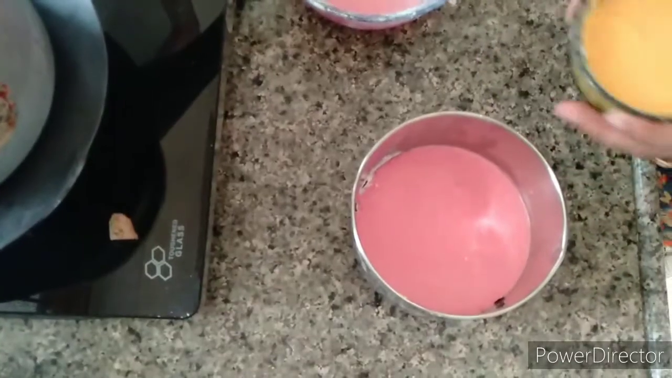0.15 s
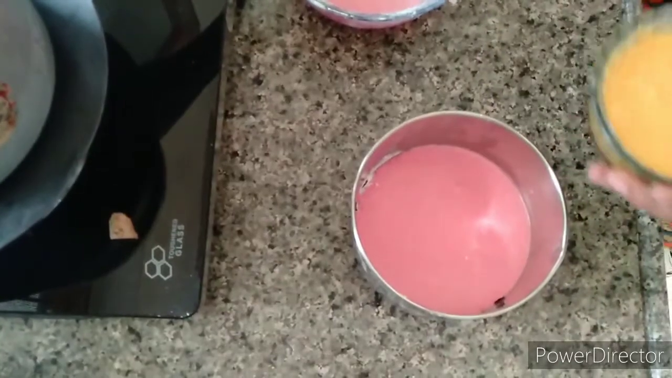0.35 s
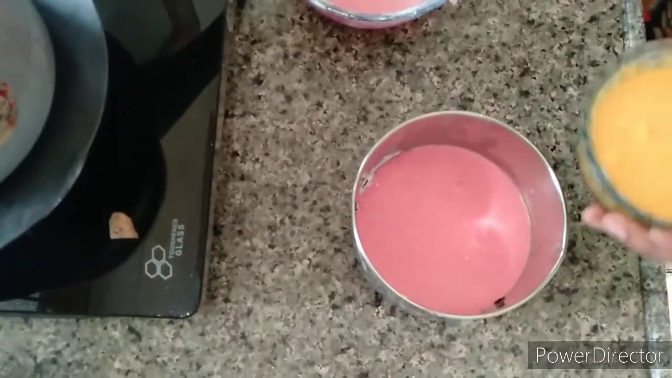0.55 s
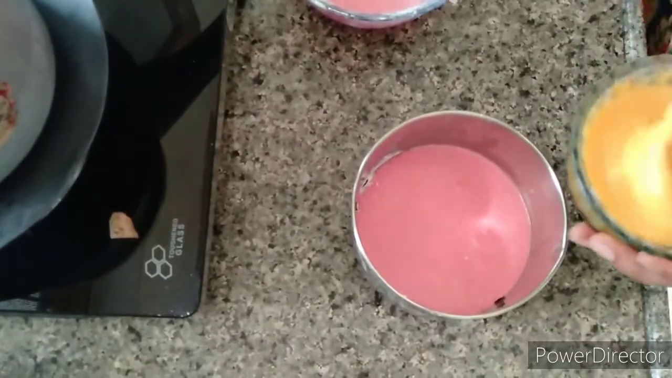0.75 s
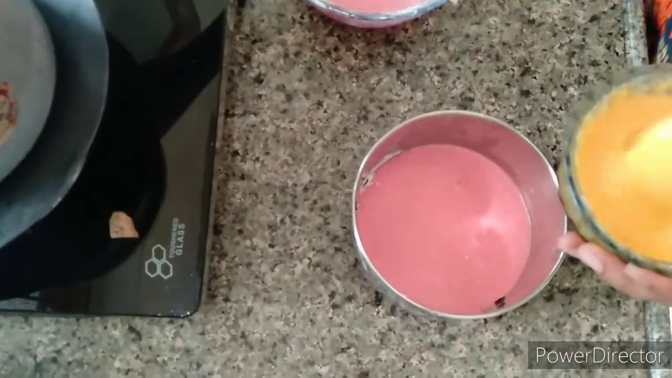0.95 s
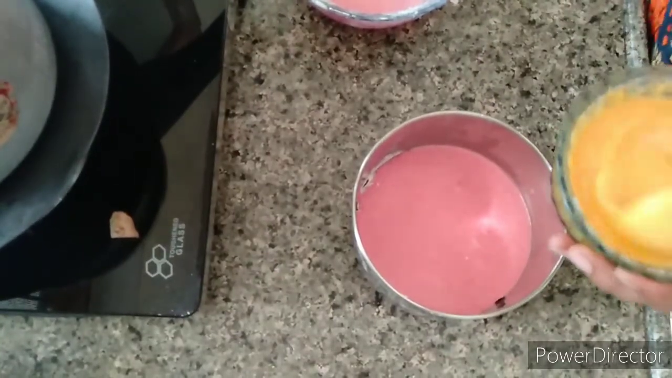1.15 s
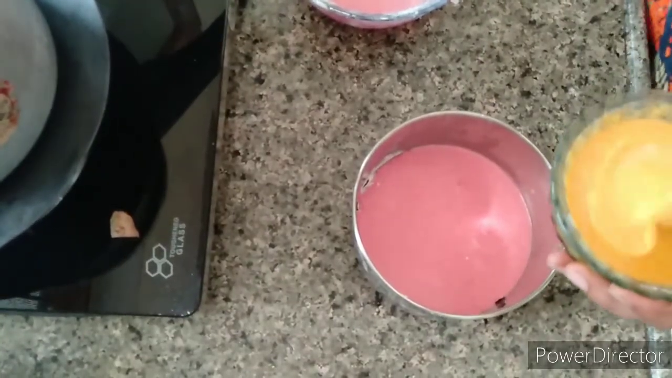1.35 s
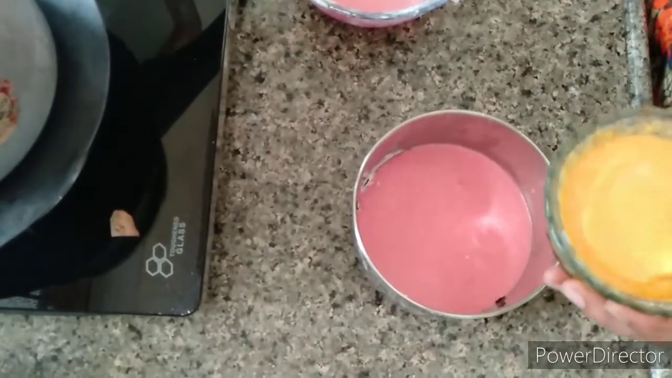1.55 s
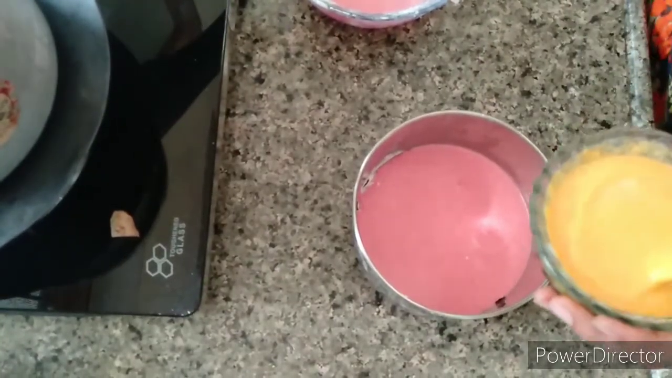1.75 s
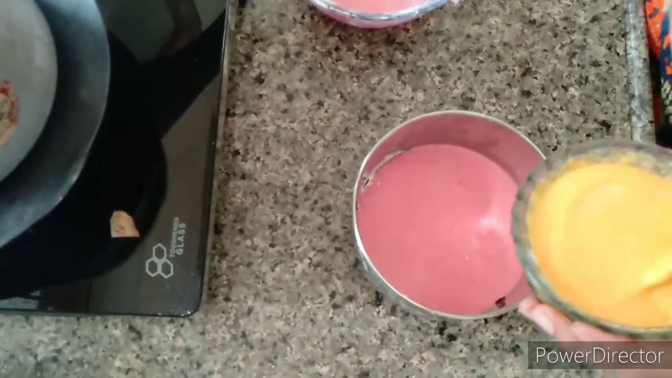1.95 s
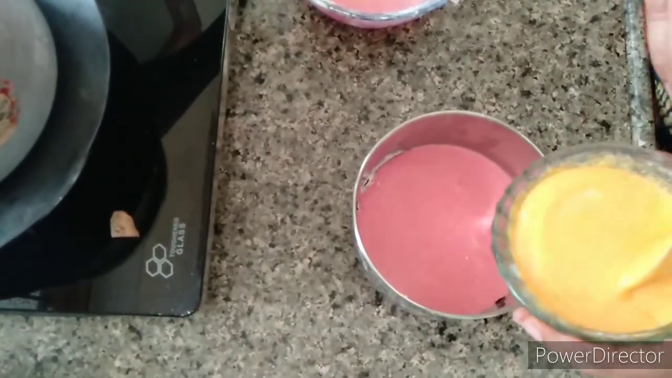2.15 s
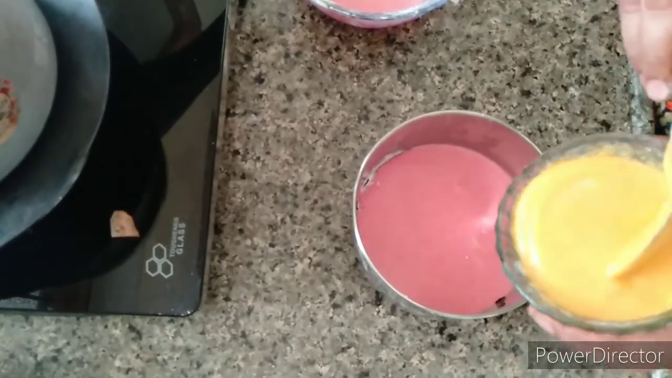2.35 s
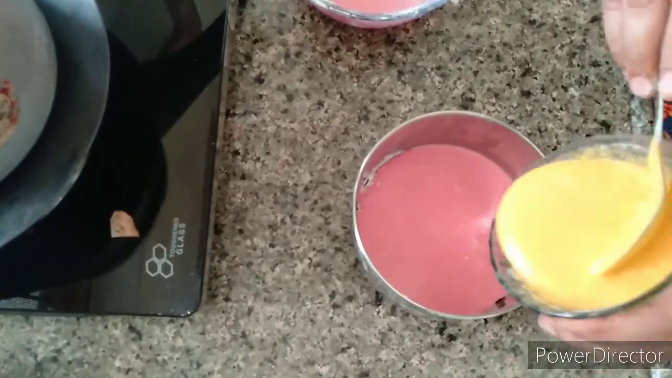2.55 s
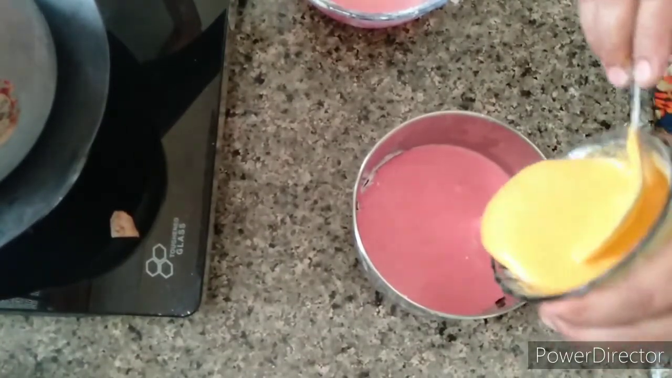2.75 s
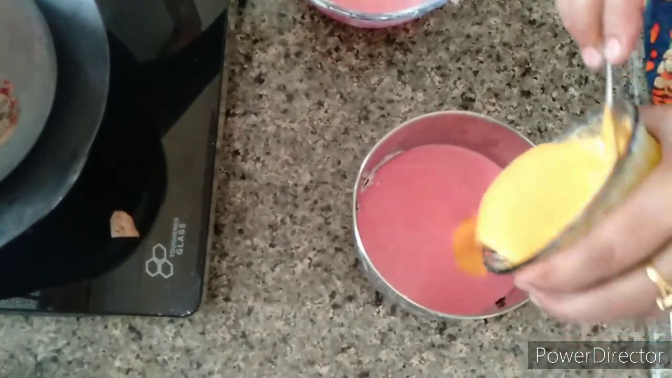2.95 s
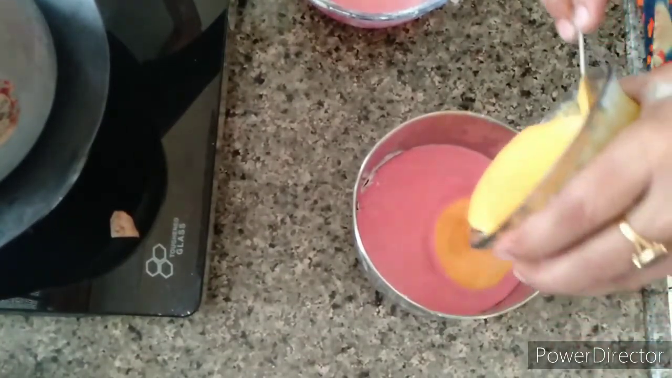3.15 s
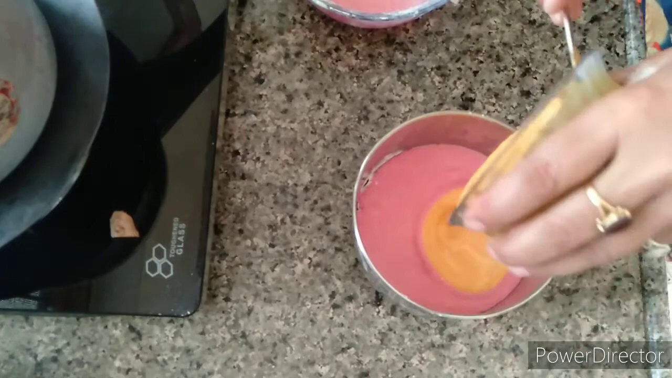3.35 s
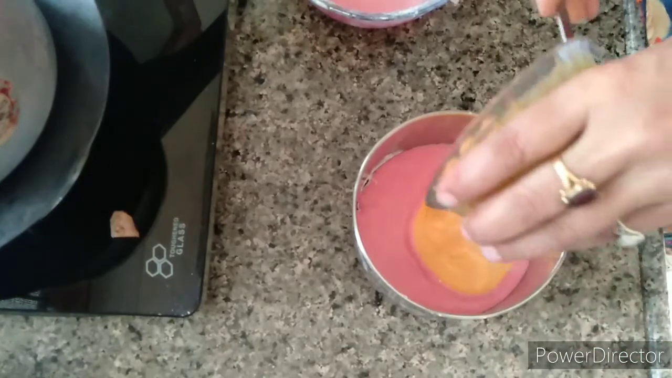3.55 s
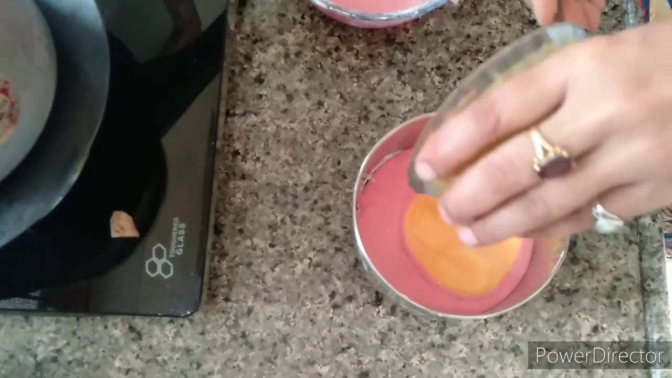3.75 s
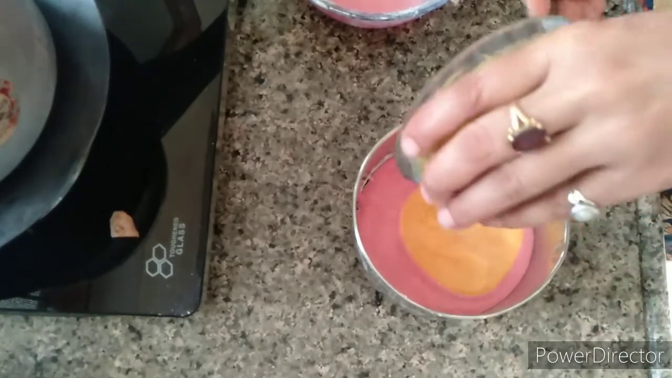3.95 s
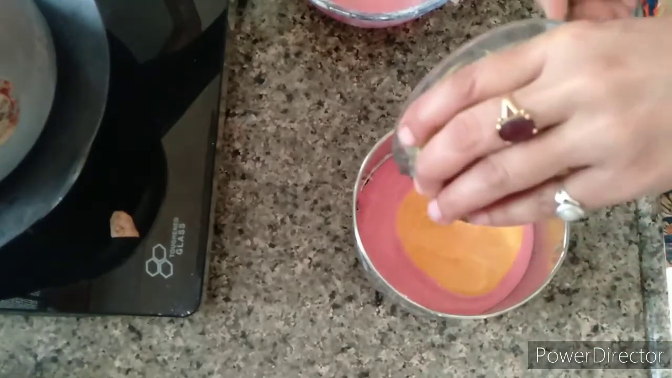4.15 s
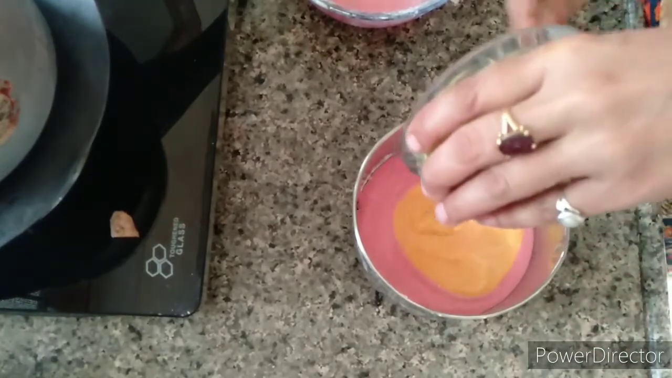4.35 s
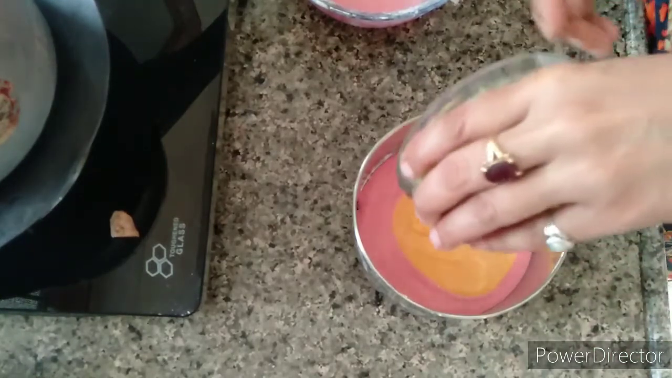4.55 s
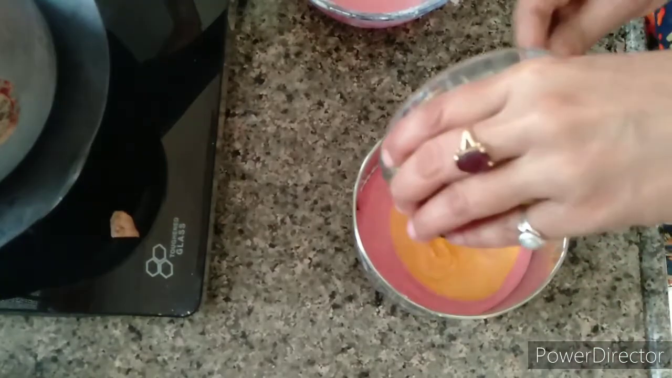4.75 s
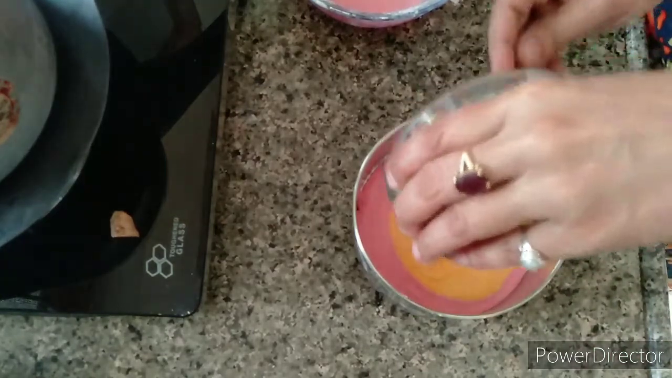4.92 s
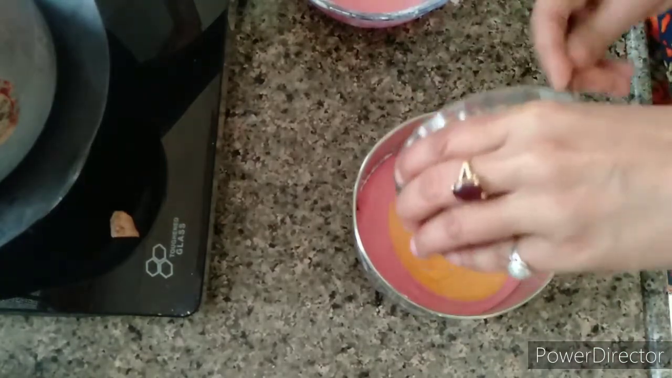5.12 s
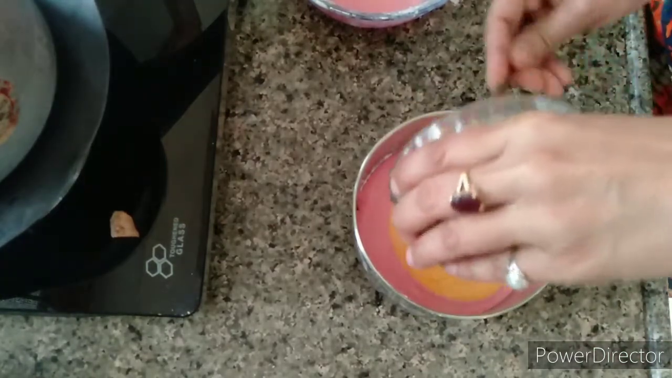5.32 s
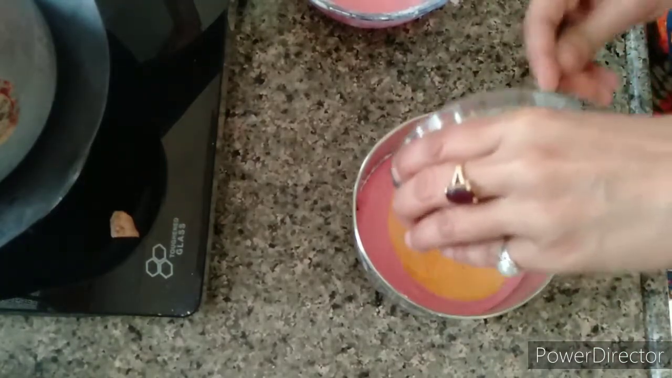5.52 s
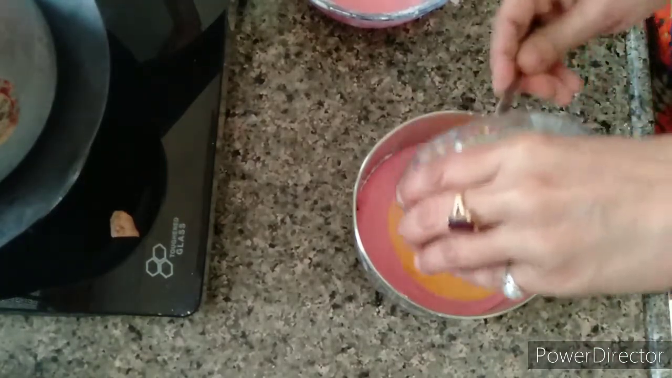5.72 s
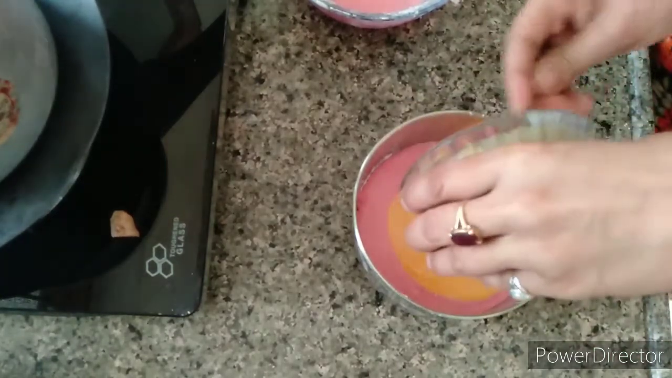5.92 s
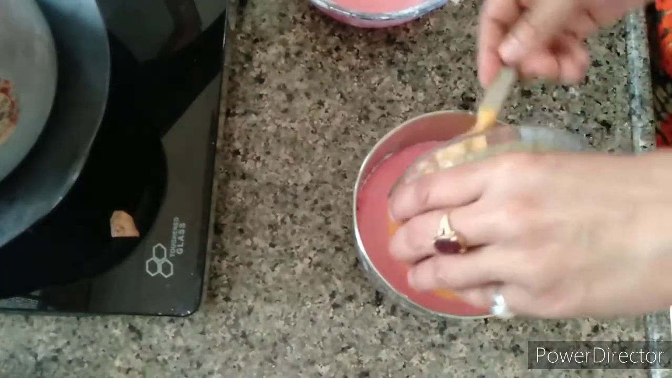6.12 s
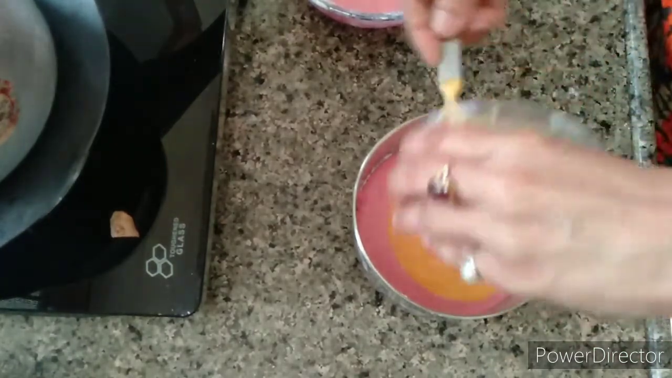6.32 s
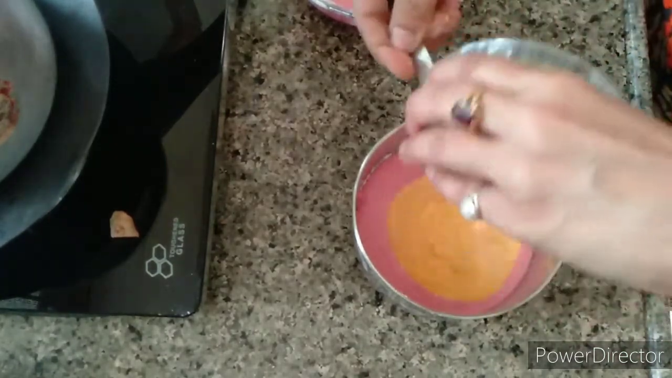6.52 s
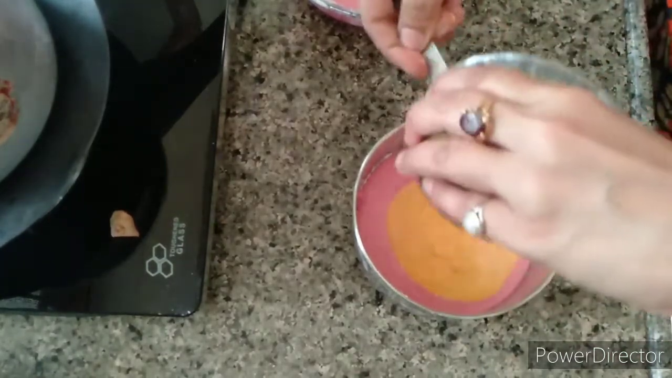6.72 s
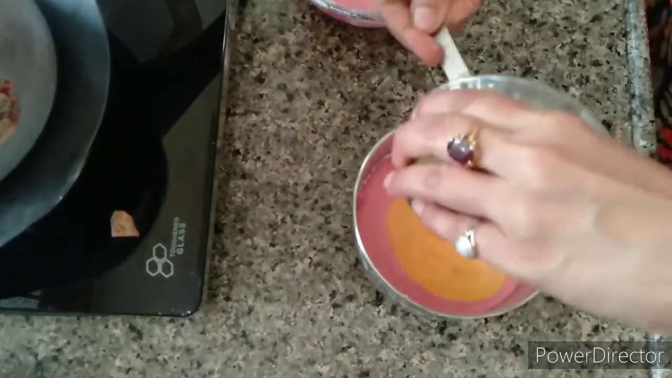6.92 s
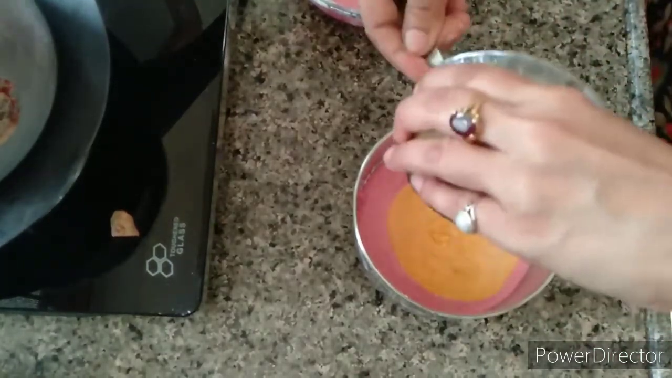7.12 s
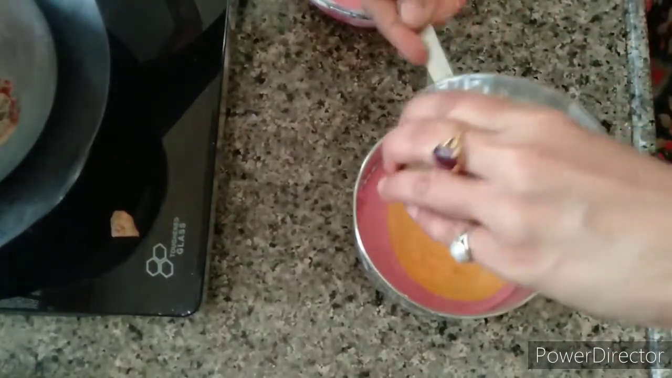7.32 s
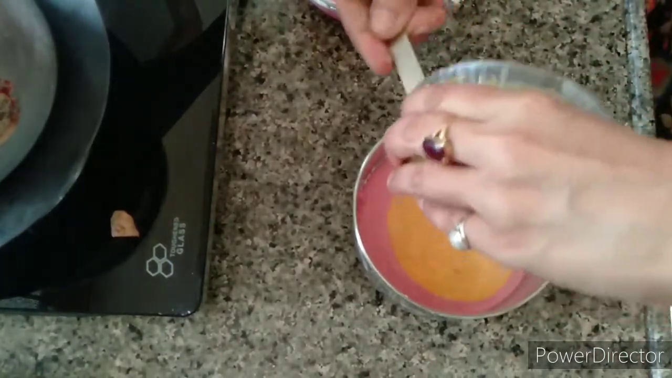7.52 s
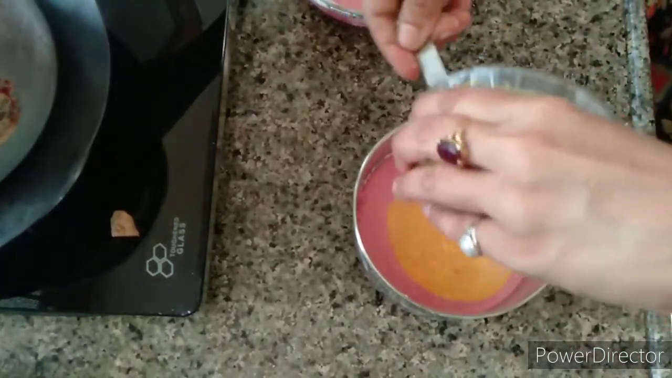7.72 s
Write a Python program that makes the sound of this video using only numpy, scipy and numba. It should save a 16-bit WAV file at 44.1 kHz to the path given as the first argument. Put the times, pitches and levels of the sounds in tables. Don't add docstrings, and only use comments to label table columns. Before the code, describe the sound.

Quiet cloth rustles and one glassy knock lead to a thin rising squeak, then sharp damped spoon clinks and scrapes on a glass bowl.

```python
import sys
import numpy as np
from scipy import signal
from scipy.io import wavfile
from scipy.ndimage import uniform_filter1d
from numba import njit

SR = 44100
rng = np.random.default_rng(int(sys.argv[2]) if len(sys.argv) > 2 else 0)


def decibels_to_gain(level_db):
    exponent = np.asarray(level_db, float) / 20
    return 10 ** exponent


def log_audio(samples):
    frames = np.atleast_2d(samples).T
    limited = np.clip(frames, -1, 1)
    pcm = np.round(limited * 32767).astype(np.int16)
    wavfile.write(sys.argv[1], SR, pcm)


N = 343098
MUFFLED_HZ, MUFFLED_DB = 1700, -7


def unit(x):
    return x / np.sqrt(np.mean(x ** 2))


def curve(rows, col, off=None):
    rows = np.array(rows)
    return np.interp(np.arange(N) / SR, rows[:, 0], rows[:, col], off, off)


@njit
def svf(x, hz, width):
    y, band, low = np.empty(len(x)), 0., 0.
    for i in range(len(x)):
        g, k = np.tan(np.pi * hz[i] / SR), width / hz[i]
        v = (band + g * (x[i] - low)) / (1 + g * (g + k))
        band = 2 * v - band
        low += 2 * g * v
        y[i] = k * v
    return y


def hiss(hz, width_hz, size=N):
    hz = np.clip(hz * np.ones(size), 10, 0.45 * SR)
    once = svf(rng.standard_normal(size), hz, 1. * width_hz)
    return unit(svf(once, hz, 1. * width_hz))


def walk(rate_hz):
    k = int(SR / rate_hz)
    steps = np.repeat(rng.standard_normal(N // k + 1), k)
    return unit(uniform_filter1d(uniform_filter1d(steps, k), k)[:N])


def swells(rows, rest_db, col=1):
    t, out = np.arange(N) / SR, decibels_to_gain(rest_db)
    for row in rows:
        late = t - row[0]
        swing_s = np.where(late < 0, row[2], row[3])
        out = out + decibels_to_gain(row[col] - 15 * np.abs(late) / swing_s)
    return out


def blooms(rows, rest_db):
    t = np.arange(N) / SR
    return decibels_to_gain(rest_db) + sum(decibels_to_gain(db) * np.exp(-(2 * (t - s) / length) ** 2 / 2) for s, db, length in rows)


def add(out, s, db, hz, t60, rise=0.00039):
    i = int(s * SR)
    t = np.arange(min(int(1.2 * t60 * SR) + 9, N - i)) / SR
    shape = (1 - np.exp(-t / rise)) * np.exp(-np.log(1000) * t / t60)
    out[i:i + len(t)] += decibels_to_gain(db) * shape * np.sin(2 * np.pi * hz * t)


def blows():
    # t/s, weight/dB, low ring f/Hz, sharpness/dB, middle ring level/dB
    rim_blows = [
        (3.5566, -29, 1846, -39.5, -46.5),
        (5.2973, -18, 1834, -20, -18.5),
        (5.5333, -25.5, 1856, -29, -32),
        (6.102, -14.5, 1844, -15.5, -18.5),
        (6.3125, -21.5, 1770, -23.5, -49),
        (6.493, -42, 1400, -34.5, -30.5),
        (7.4109, -16.5, 1842, -17.5, -22.5),
    ]
    # t/s, weight/dB, low ring f/Hz, sharpness/dB, edge level/dB
    wall_blows = [(1.1366, -24.5, 1450, -32.5, -21), (2.9432, -46, 1810, -53.5, -46),
                  (3.5935, -47, 1810, -50, -37), (4.044, -32, 1860, -48.5, -31.5),
                  (4.4183, -37.5, 1480, -61, -68), (4.6219, -33, 1070, -52, -35),
                  (4.7038, -29.5, 1065, -29, -14), (4.9237, -47, 1840, -70, -48),
                  (5.1018, -28, 1120, -38, -20), (5.5501, -23.5, 1430, -33, -19),
                  (5.5759, -32, 1790, -37, -20.5), (5.7356, -61, 2010, -58, -39),
                  (5.8548, -23, 1337, -33, -38), (6.048, -60, 1270, -42, -47),
                  (6.3487, -55, 1870, -49, -50), (6.3838, -23, 1510, -34.5, -42),
                  (6.7361, -19.5, 1840, -28.5, -34), (7.0643, -20, 1784, -15.5, -12),
                  (7.197, -30.5, 1877, -44, -27.5), (7.4732, -23, 1465, -29.5, -25),
                  (7.6081, -57, 1950, -73, -48), (7.621, -49, 1820, -51, -56)]
    travel_s = 0.00076
    hits = []
    for s, weight_db, low_hz, sharp_db, middle_db in rim_blows:
        edge_db, top_db = 0.8 * sharp_db, 1.415 * sharp_db + 6
        hits.append((s + travel_s, weight_db, low_hz, sharp_db, edge_db, middle_db, top_db))
    for s, weight_db, low_hz, sharp_db, edge_db in wall_blows:
        middle_db, top_db = 1.11 * sharp_db + 1.3, sharp_db - 54
        hits.append((s + travel_s, weight_db, low_hz, sharp_db, edge_db, middle_db, top_db))
    return sorted(hits)


def edge_mode_hz(low_hz):
    return 3800 if low_hz < 1250 else 2900


def impact_cracks(hits):
    # low f/Hz, high f/Hz, level/dB
    crack_bands = [
        (1840, 4500, -8),
        (600, 2140, 6.5),
        (4270, 8730, 9),
        (11700, 21000, 9),
    ]
    out, trains = np.zeros((2, N)), np.zeros((len(crack_bands), 2, N))
    t = np.arange(2000) / SR
    decay = np.exp(-np.log(1000) * t / 0.018)
    for s, weight_db, low_hz, sharp_db, edge_db, *_ in hits:
        burst = np.zeros((2, len(t)))
        burst[0] = decibels_to_gain(-8) * rng.standard_normal(len(t)) * decay
        burst[:, 0] = -1, -4
        body_db = 0.71 * weight_db - 29 + 10.5 * (low_hz < MUFFLED_HZ)
        fizz_db = 0.77 * sharp_db - 19.5
        span = slice(int(s * SR), int(s * SR) + len(t))
        trains[:, :, span] += decibels_to_gain([edge_db, body_db, sharp_db, fizz_db])[:, None, None] * burst
        low_track = np.full(len(t), max(low_hz, 1450.))
        edge_track = np.full(len(t), 1. * edge_mode_hz(low_hz))
        for side in range(2):
            out[side, span] += decibels_to_gain(weight_db + 14.5) * svf(burst[side], low_track, 694.0)
            out[side, span] += decibels_to_gain(edge_db + 8.5) * svf(burst[side], edge_track, 520.0)
    for train, (low_hz, high_hz, db) in zip(trains, crack_bands):
        band = signal.butter(5, [low_hz, high_hz], "band", fs=SR, output="sos")
        out += decibels_to_gain(db + 7.5) * signal.sosfilt(band, train)
    return out


def glass_rings(out, hits):
    # ratio to ring pitch, level/dB, t60/s
    low_ring = [(1, 1, 0.043), (1.04, -6.5, 0.028), (0.851, -6.5, 0.014)]
    edge_ring = [(1.001, -7, 0.021), (1.07, -15, 0.0032)]
    middle_ring = [(1, 5, .07), (.984, -2, .045), (.963, -4, .03), (1.02, -1, .035)]
    top_ring = [(1.027, 5, .02), (1.005, -1, .03), (.98, -6, .015)]
    for s, weight_db, low_hz, sharp_db, edge_db, middle_db, top_db in hits:
        muffle_db = MUFFLED_DB * (low_hz < MUFFLED_HZ)
        contact_s = 0.00033 * decibels_to_gain(-0.3 * (sharp_db + 18.5))
        for hz, db, ring in ((low_hz, weight_db + muffle_db, low_ring),
                             (edge_mode_hz(low_hz), edge_db, edge_ring),
                             (4770, middle_db + muffle_db, middle_ring),
                             (8180, top_db, top_ring)):
            for ratio, part_db, t60 in ring:
                add(out, s, db + part_db, hz * ratio, t60, contact_s)


def spoon_blade(out, hits):
    # f/Hz, level over sharpness/dB, t60/s
    blade = [(2920, -17.5, 0.062), (3303, -11, 0.053), (3950, -1, 0.023), (4980, -9, .03),
             (5440, -13, 0.03), (6020, -8.5, 0.044), (6300, -6, .025), (7170, -5, .02)]
    for s, _, low_hz, sharp_db, *_ in hits:
        muffle_db = MUFFLED_DB * (low_hz < MUFFLED_HZ)
        for hz, db, t60 in blade:
            scatter_db = 3 * rng.standard_normal()
            add(out, s, sharp_db + db + scatter_db + muffle_db, hz, t60)


def thuds(out):
    # t/s, level/dB, f/Hz, t60/s
    knocks = [
        (1.1375, -34.5, 322, 0.052),
        (1.138, -26.5, 720, 0.017),
        (1.1378, -11.5, 1710, 0.0066),
        (1.1378, -17.5, 4240, 0.0072),
        (7.4125, -31.5, 280, 0.015),
        (6.3135, -36, 440, 0.02),
    ]
    for knock in knocks:
        add(out, *knock, rise=0.0005)


def bowl():
    hits, rings = blows(), np.zeros(N)
    direct_crack, room_crack = impact_cracks(hits)
    glass_rings(rings, hits)
    spoon_blade(rings, hits)
    thuds(rings)
    return direct_crack + rings, room_crack + decibels_to_gain(-6) * rings


def squealing_edge():
    # t/s, f/Hz, level/dB
    squeal = [
        (2.475, 6430, -55.5),
        (2.52, 5420, -48),
        (2.56, 5700, -56),
        (2.59, 6250, -41.5),
        (2.61, 7600, -52),
        (2.64, 9300, -50),
        (2.675, 10480, -44.5),
        (2.705, 9280, -43),
        (2.74, 9400, -70),
    ]
    # t/s, level/dB, rise/s, fall/s, f/Hz
    whistles = [
        (0.18, -65, 0.15, 0.12, 8340),
        (1.754, -72, 0.07, 0.1, 8950),
        (2.3, -71, 0.15, 0.14, 8600),
        (2.4, -65.5, 0.22, 0.43, 8350),
        (3.166, -62, 0.008, 0.03, 8850),
        (3.296, -60, 0.18, 0.12, 8300),
        (4.05, -65, 0.1, 0.35, 8280),
    ]
    hz = curve(squeal, 1)
    ragged = decibels_to_gain(curve(squeal, 2, off=-120) + 4.0 * walk(140))
    out = ragged * (hiss(hz, 370) + decibels_to_gain(-24) * hiss(2 * hz, 900))
    return out + swells(whistles, -120) * decibels_to_gain(2.6 * walk(60)) * hiss(curve(whistles, -1), 690)


def friction(rows, body_rest_db, fizz_rest_db, bands, grain_db):
    body = sum(decibels_to_gain(db) * hiss(hz, width) for hz, width, db in bands)
    fizz = hiss(14700, 6200)
    rubbing = swells(rows, body_rest_db) * body + swells(rows, fizz_rest_db, col=-1) * fizz
    return decibels_to_gain(grain_db * walk(150)) * rubbing


def spoon_drag():
    # t/s, level/dB, rise/s, fall/s, fizz level/dB
    strokes = [(4.8, -52.5, 0.03, 0.2, -69), (5.01, -77, 0.02, 0.07, -84), (5.6, -46.5, 0.02, 0.1, -67),
               (5.73, -54.5, 0.2, 0.51, -70), (6.0, -63, 0.15, 0.3, -71), (6.095, -49, 0.08, 0.005, -69),
               (6.62, -60.5, 0.2, 0.3, -72), (6.73, -45, 0.022, 0.0069, -65),
               (6.878, -52, 0.0091, 0.066, -53), (7.3, -57.5, 0.2, 0.49, -76.5),
               (7.55, -56, 0.02, 0.036, -78), (7.614, -51, 0.029, 0.052, -65),
               (7.77, -59, 0.057, 0.05, -67)]
    # f/Hz, width/Hz, level/dB
    bands = [(1400, 1100, -28), (2870, 1040, -9.5), (4700, 5100, -11.5), (6200, 3300, -9.5)]
    return friction(strokes, -76, -84, bands, grain_db=2.5)


def sleeves():
    # t/s, level/dB, rise/s, fall/s, fizz level/dB
    rubs = [(0.092, -57, 0.043, 0.07, -64), (0.356, -48.5, 0.14, 0.11, -57), (0.714, -58, 0.06, 0.13, -63),
            (0.932, -55, 0.16, 0.11, -67), (1.116, -49, 0.03, 0.024, -68), (1.382, -61.5, 0.15, 0.39, -70),
            (1.918, -57, 0.0071, 0.065, -57), (2.328, -59, 0.018, 0.1, -61), (2.6, -64, 0.21, 0.12, -62),
            (3.03, -70, 0.011, 0.2, -68), (3.17, -58, 0.01, 0.3, -74), (3.6, -57, 0.005, 0.076, -64),
            (3.808, -67, 0.03, 0.086, -61), (4.014, -56, 0.061, 0.1, -71), (4.432, -59, 0.13, 0.056, -71)]
    # f/Hz, width/Hz, level/dB
    bands = [(6530, 1300, -4), (3180, 7300, -4.5), (9800, 7600, -20)]
    return friction(rubs, -76, -74, bands, grain_db=1.0)


def crockery():
    # t/s, level/dB, f/Hz, t60/s
    tinkles = [
        (0.5665, -38.5, 1690, 0.027),
        (0.7456, -45.5, 1445, 0.038),
        (0.9677, -39.5, 2870, 0.029),
        (1.7912, -40.5, 1955, 0.024),
        (5.2684, -43, 1630, 0.14),
        (5.5063, -40.5, 1720, 0.062),
        (7.2883, -45.5, 6480, 0.061),
        (7.6088, -37.5, 2950, 0.022),
    ]
    out = np.zeros(N)
    for s, db, hz, t60 in tinkles:
        add(out, s, db, hz, t60, rise=0.0013)
        add(out, s, db - 1, 1.047 * hz, 0.58 * t60, rise=0.0014)
    return out


def kitchen(x):
    # f/Hz, t60/s, level/dB
    room = [(300, 0.23, -23.5), (740, 0.19, -30.5), (1400, 0.38, -26.5), (2400, 0.3, -27.5),
            (4870, 0.35, -26.5), (7870, 0.33, -30), (14900, 0.26, -20)]
    t = np.arange(int(0.8 * SR)) / SR
    tail = sum(decibels_to_gain(db - 60 * t / t60) * hiss(hz, 0.9 * hz, size=len(t)) for hz, t60, db in room)
    onset = 1 - np.exp(-t / 0.0022)
    return signal.fftconvolve(x, tail * onset * decibels_to_gain(-16))[:N]


def appliance():
    # f/Hz, width/Hz, resting level/dB
    drone_modes = [(60.5, 4.33, -67.5), (116.7, 18, -59.5), (138, 7.5, -57), (158.8, 4.42, -59)]
    # t/s, level/dB, length/s
    mode_blooms = [
        [(0.0, -54, 0.3), (1.3, -60.5, 0.6), (2.32, -54, 0.13), (2.84, -54, 0.14), (3.42, -55, 0.25),
         (4.85, -54, 0.98), (5.6, -64, 0.3), (6.45, -49.5, 0.72), (7.3, -56, 0.22)],
        [(1.93, -58, 0.2), (3.29, -54, 0.22), (4.27, -51.5, 0.24), (5.41, -49, 0.14), (5.79, -55, 0.15),
         (6.67, -56, 0.11), (6.96, -52, 0.097), (7.3, -57, 0.12)],
        [(0.5, -49.5, 0.18), (1.6, -59, 0.69), (2.55, -49, 0.26), (3.96, -59.5, 0.33), (4.4, -59, 0.28),
         (5.7, -51.5, 0.4), (6.67, -59, 0.088), (7.45, -56, 0.2)],
        [(1.0, -57, 0.32), (1.5, -45.5, 0.52), (2.25, -41.5, 0.25), (2.8, -50.5, 0.52), (7.21, -54.5, 0.11)],
    ]
    # f/Hz, width/Hz, level/dB
    whine = [(384.8, 12, -67.5), (460, 65, -67.5), (543, 8.9, -69.5), (1448, 38, -72), (3100, 26, -71.5),
             (5300, 59, -72.5), (6250, 37, -72)]
    out = np.zeros(N)
    for (hz, width, rest_db), rows in zip(drone_modes, mode_blooms):
        phase = 2 * np.pi * np.cumsum(hz + 0.301 * width * walk(6)) / SR
        out += blooms(rows, rest_db) * decibels_to_gain(0.5 + 1.88 * walk(15)) * np.sin(phase)
    return out + sum(decibels_to_gain(db) * hiss(hz, width) for hz, width, db in whine)


def street():
    # t/s, level/dB, length/s
    passes = [
        (0.0, -57.5, 0.26),
        (2.79, -75.5, 0.2),
        (4.27, -61.5, 0.53),
        (5.24, -61, 0.2),
        (6.4, -55.5, 0.97),
    ]
    return blooms(passes, -58) * decibels_to_gain(-4.5) * hiss(314, 830)


def air():
    # f/Hz, level density/dB per Hz
    spectrum = [(20, 7.5), (81, -13), (150, -2.5), (216, -25.5), (1000, -21), (3700, -33.5), (5800, -31.5),
                (9800, -38.5)]
    hz, db = np.transpose(spectrum)
    centres = np.r_[22, 64 * 2 ** np.arange(0, 8.2, 0.4)]
    levels = decibels_to_gain(np.interp(np.log(centres), np.log(hz), db)) * np.sqrt(centres)
    swell = walk(0.3)
    bands = sum(g * decibels_to_gain(0.4 * swell + 0.4 * walk(11)) * hiss(c, 0.5 * c) for c, g in zip(centres, levels))
    return decibels_to_gain(-50) * unit(bands)


def scene():
    near, spread = bowl()
    squeal, far = squealing_edge(), crockery()
    wet = kitchen(spread + decibels_to_gain(6.5) * far + decibels_to_gain(6.5) * squeal)
    rubbing = spoon_drag() + sleeves()
    background = appliance() + street() + air()
    return (near + far + decibels_to_gain(-5) * squeal + wet + rubbing + background)[None]


def band_limit(x):
    return signal.sosfilt(signal.butter(12, 16790, fs=SR, output="sos"), x)


def record(dry):
    cut = signal.sosfilt(signal.ellip(8, 0.2, 33, 15600, fs=SR, output="sos"), dry)
    cut = signal.sosfilt(signal.butter(1, 60, "high", fs=SR, output="sos"), cut)
    return band_limit(cut)


dry = scene()
out = record(dry)
log_audio(out)
```